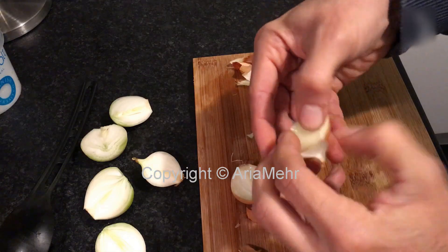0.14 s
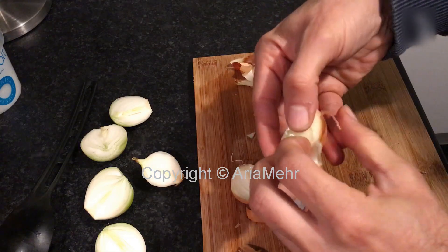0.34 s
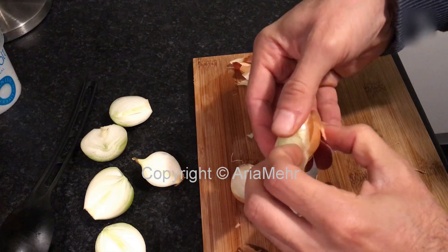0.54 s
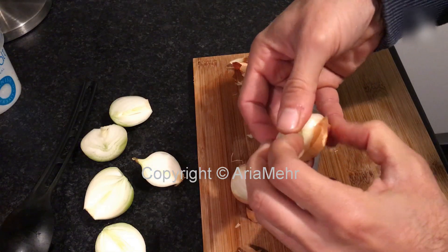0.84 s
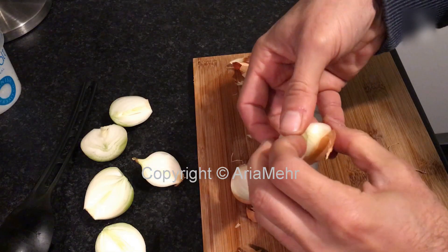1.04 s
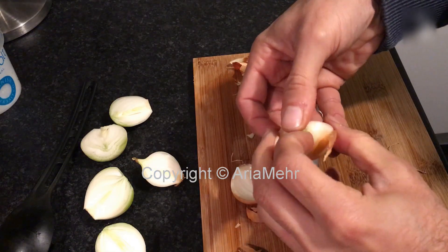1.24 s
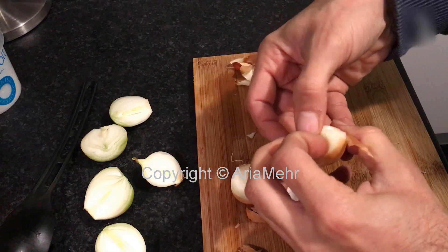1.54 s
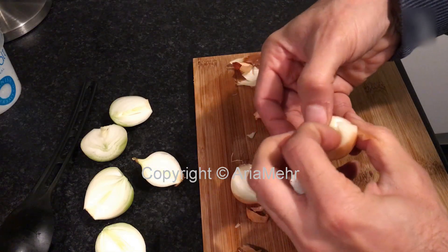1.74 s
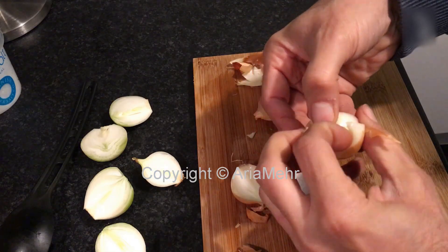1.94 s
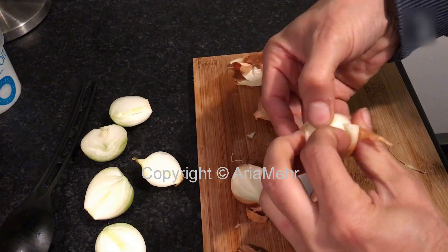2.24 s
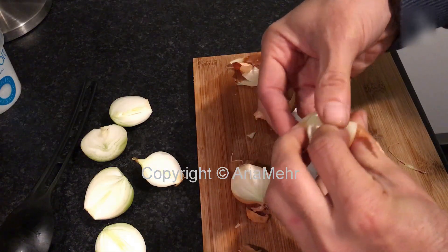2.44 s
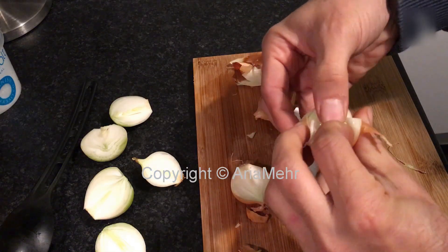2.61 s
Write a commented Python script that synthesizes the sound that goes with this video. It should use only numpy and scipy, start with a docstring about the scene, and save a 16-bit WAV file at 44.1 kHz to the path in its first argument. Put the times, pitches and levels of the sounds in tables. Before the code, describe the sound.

Dry onion skin crackles and snaps as fingers peel it in a quiet kitchen.

```python
"""Peeling a small onion

Fingers peel dry onion skin over a wooden board, close to the microphone in a quiet kitchen.
Each break is a tiny burst of fractures that rings the loose flake; fine crackle and rubbing fill
the gaps, and the hands regrip once with a soft thump. An appliance hums behind, the room answers
briefly, and a limiter ducks after the loudest snaps."""
import sys
import numpy as np
from scipy import signal
from scipy.fft import rfft, irfft, next_fast_len
from scipy.io import wavfile
from scipy.ndimage import uniform_filter1d, minimum_filter1d

SR = 44100
rng = np.random.default_rng(int(sys.argv[2]) if len(sys.argv) > 2 else 0)


def generate_wav(sig):
    """Save sig (samples, or channels by samples) to the path in sys.argv[1] as 16-bit PCM at SR."""
    pcm = np.round(np.clip(np.atleast_2d(sig).T, -1, 1) * 32767).astype(np.int16)
    wavfile.write(sys.argv[1], SR, pcm)


N = 122157

# skin breaks, levels before trim: t/s, burst decay/s, ring f/Hz, ring/dB, crack/dB, knock/dB
SKIN_BREAKS = [(.0144,0.00059,5330,-30,-29,-45), (.0272,0.00064,5700,-9,-5,-22),
               (.0341,0.00055,5650,-19,-14,-40), (.0781,0.00037,5600,-15.5,-18,-39),
               (.0885,0.00068,4940,-13.5,-22,-29), (.0962,0.00065,5600,-12.5,-17.5,-33),
               (.1084,.0018,4810,-21,-29,-34), (.1155,0.00069,5330,-24,-27,-37),
               (.1236,.0009,4600,-28,-30,-39), (.1484,.0006,4600,-20,-24,-43),
               (.1823,0.00024,5130,-15,-13.5,-28), (.1851,0.00044,5200,-3.5,-6,-41),
               (.2257,0.00062,5340,-32,-28,-33), (.2408,0.00058,5470,-11.5,-6.5,-41),
               (.2533,0.00076,5800,-18,-11.5,-22), (.3169,0.0021,5160,-8,-8.5,-24),
               (.3186,0.0016,4970,-23,-14,-40), (.3203,.0012,4890,-3,-2,-52),
               (.3514,0.00089,5600,-18.5,-16.5,-52), (.399,.0012,5010,-19.5,-17.5,-29),
               (.4392,.0003,5860,-31.5,-22.5,-52), (.4434,0.00045,5840,-27.5,-20,-38),
               (.4841,.0007,5790,-36,-35,-53), (.5673,0.00053,6350,-36,-25,-32),
               (.5712,.0014,4740,-29,-34,-51), (.5759,0.00021,4870,-27,-30,-41),
               (.6056,0.0015,4400,-18.5,-23,-23.5), (.7835,0.0012,3830,-40,-40,-47),
               (.8707,.0009,5100,-34,-34.5,-41), (1.2384,.0005,7200,-40,-34,-55),
               (1.2855,0.0058,6000,-22.5,-23,-33), (1.3149,0.0029,6200,-29.5,-32,-47),
               (1.3984,.001,6800,-54,-36,-50), (1.4807,.0018,4800,-31.5,-30,-49),
               (1.543,.0003,4380,-27,-30,-48), (1.5473,0.00093,5100,-27,-31,-48),
               (1.5556,.0018,5100,-13,-22.5,-26.5), (1.5594,.0022,5230,-20,-20,-28),
               (1.5678,0.00025,4900,-2,-7,-21), (1.5782,0.00019,5030,-4.5,-17,-33),
               (1.5874,0.00047,4800,-17,-22,-35), (1.602,0.00055,4760,-22,-30,-32),
               (1.607,0.00055,5040,-12,-26,-24), (1.6113,0.00086,4200,-0.5,-6.5,-9),
               (1.6343,.0006,4400,-17.5,-23,-48), (1.6566,0.0007,3700,-3.5,-14,-13),
               (1.7036,.001,4900,-33,-24.5,-41), (1.787,0.00052,5200,-20.5,-22.5,-48),
               (1.802,0.00026,6200,-24,-28.5,-38), (1.823,0.00035,4740,-24.5,-30,-45),
               (1.837,0.00079,3580,-7.5,-14,-17.5), (1.8933,.0008,5870,-28,-27,-56),
               (1.9114,0.00035,4640,-18.5,-22,-27), (1.9206,0.00044,4190,-27,-25.5,-37),
               (1.939,0.00041,3650,-21.5,-26,-33), (1.972,0.00087,4080,-21.5,-25,-32),
               (2.0246,.0005,3250,-2,-11.5,-20), (2.047,.0011,6500,-19,-28,-33),
               (2.055,0.00036,6360,-24,-37,-48), (2.0646,.0006,3580,-2.5,-8,-9),
               (2.1638,.0004,3650,-36,-29,-40), (2.1781,0.00045,4300,-16,-17,-28.5),
               (2.3183,.0004,6300,-26.5,-37,-44), (2.3357,0.00016,5100,-19,-19,-31),
               (2.3495,.0003,6760,-35,-28,-50), (2.4009,0.00064,5300,-24.5,-25,-29.5),
               (2.41,0.0015,2600,-35.5,-35,-27), (2.4373,0.00098,5400,-30.5,-27,-37),
               (2.4555,0.0024,2630,-30.5,-31,-38), (2.5196,0.00072,2970,-27,-34,-26.5),
               (2.5637,0.00032,3250,-16,-24,-20), (2.585,0.00089,3370,-18.5,-13,-20),
               (2.6411,0.00028,3170,-4.5,-12.5,-17), (2.692,0.00043,5300,-18.5,-21,-28),
               (2.7084,0.00066,2640,-15.5,-11,-26), (2.7454,0.00045,3480,-18.5,-19.5,-34),
               (2.7528,0.00034,4630,-21,-26,-26)]
# crackle as the skin is bent and pulled: t/s, level/dB
CRACKLE_ENVELOPE = [(0, -30.5), (.12, -29.5), (.29, -54), (.42, -55), (.52, -42), (.8, -44.5), (.92, -61),
                    (1.2, -47.5), (1.27, -39.5), (1.42, -55), (1.48, -35.5), (1.58, -30.5), (1.75, -39),
                    (1.95, -35), (2.27, -38.5), (2.45, -36.5), (2.67, -43), (2.75, -26)]
# flake resonances: f/Hz, relative level/dB
FLAKE_MODES = [(1700, -8), (3200, -11.5), (4800, 4.5), (6800, -8), (9000, 0.5), (12000, 12), (14500, -9)]
# fingertips sliding on the skin: t/s, level/dB
RUB_ENVELOPE = [(0, -45), (.13, -40.5), (.29, -33.5), (.37, -35.5), (.5, -43.5), (.83, -42.5), (.86, -57),
                (1.21, -54), (1.245, -53), (1.32, -39), (1.35, -69), (1.44, -62), (1.48, -43),
                (1.75, -39.5), (2.14, -47), (2.27, -43.5), (2.45, -38.5), (2.69, -45), (2.73, -26.5)]
# rubbing spectrum: f/Hz, relative density/dB
RUB_SPECTRUM = [(200, -38), (900, -1.5), (2000, 11.5), (4000, 11.5), (7000, 1.5), (10500, -0.5),
                (12500, 10), (16000, -10)]
# grip shift: t/s, 1/e half-width/s, level/dB
GRIP_THUMPS = [(1.918, .035, -25)]
# thump spectrum: f/Hz, relative density/dB
THUMP_SPECTRUM = [(20, -19.5), (42, -6), (70, 3), (130, -4), (200, -21), (500, -48), (2000, -80)]
# appliance tones: f/Hz, level/dB
HUM_TONES = [(100, -39), (171.5, -44.5), (199.6, -34), (300.5, -51), (399.5, -53)]
# steady room noise: f/Hz, relative density/dB
RUSH_SPECTRUM = [(20, -34), (35, -18.5), (52, 1.5), (78, -17.5), (105, 2.5), (135, -2), (190, -7),
                 (250, -12), (450, -19), (700, -19), (1000, -18.5), (1600, -31), (2500, -39), (5000, -36.5),
                 (9000, -48.5), (16000, -42)]
# colour of the reflections: f/Hz, relative density/dB
ECHO_SPECTRUM = [(300, 0.5), (1500, 4.5), (3400, 2), (6000, 3), (10000, 0.5), (16000, -3.5)]
# microphone response: f/Hz, gain/dB
MIC_RESPONSE = [(600, 0), (800, -5), (1300, -4), (1650, -0.5), (1900, 1), (3200, -1.5), (3900, -6),
                (4700, -4.5), (6800, 0.5), (7700, 0), (8900, 1), (10400, -6), (11800, -3.5), (14000, -6),
                (16000, 2)]

RING_TRIM_DB, CRACK_TRIM_DB, KNOCK_TRIM_DB = 3, 5.5, 2
CRACK_HZ, KNOCK_HZ = 10940, 1534
EARLY_GAP_S, EARLY_T60_S, EARLY_DB = 0.0013, 0.041, -9.5  # reflections off hands and board


def snaps():
    """Each break, a dying burst of fractures scattered by the hands, drives a ring, crack and knock."""
    lead_s, level_window_s = 0.001, 0.0035
    out = np.zeros(N + SR)
    t = np.arange(SR // 25) / SR - lead_s
    scatter = decay(t, EARLY_GAP_S, EARLY_T60_S)
    for start_s, decay_s, ring_hz, ring_db, crack_db, knock_db in SKIN_BREAKS:
        fracture = np.exp(-t / decay_s) * (t >= 0)
        envelope = np.hypot(unit(fracture), undb(EARLY_DB) * unit(scatter))
        burst = whiten(rng.standard_normal(len(t)) * envelope)
        i = max(int((start_s - lead_s) * SR), 0)
        for hz, q1, q2, db in ((ring_hz, 1.31, 0.88, ring_db + RING_TRIM_DB),  # flake ring
                               (CRACK_HZ, 1, 0.28, crack_db + CRACK_TRIM_DB),  # treble crack
                               (KNOCK_HZ, 1, 0.6, knock_db + KNOCK_TRIM_DB)):  # hollow knock
            band = resonate(resonate(burst, hz, q1), hz, q2)
            out[i:i + len(t)] += band * undb(db) * np.sqrt(level_window_s * SR / np.sum(band ** 2))
    return out[:N]


def crackle(rate_per_s=800, spread_db=4.2):
    """Small fractures, most faint and a few strong, each shared unevenly among the flakes."""
    size = np.minimum(rng.exponential(size=N), 4)
    fractures = (rng.random(N) < rate_per_s / SR) * undb(spread_db * size)
    flakes = sum(undb(db) * unit(resonate(fractures * rng.standard_normal(N), hz, q=0.53))
                 for hz, db in FLAKE_MODES)
    return unit(flakes) * curve(CRACKLE_ENVELOPE)


def rubbing(rough_db=3.5, rough_per_s=220):
    """Papery hiss of fingertips that catch and slip."""
    hiss = noise(RUB_SPECTRUM) * undb(rough_db * drift(rough_per_s))
    return unit(hiss) * curve(RUB_ENVELOPE)


def grip_thump():
    """Dull swell as the hands regrip."""
    t = np.arange(N) / SR
    swell = sum(undb(db) * np.exp(-((t - at_s) / width_s) ** 2) for at_s, width_s, db in GRIP_THUMPS)
    return noise(THUMP_SPECTRUM) * swell


def appliance(waver_db=0.5, waver_rad=0.24, rush_db=-31.5):
    """Slightly wavering hum over a low steady rush."""
    t = np.arange(N) / SR
    hum = np.zeros(N)
    for hz, db in HUM_TONES:
        amplitude = np.sqrt(2) * undb(db + waver_db * drift(5.1))
        phase_rad = 2 * np.pi * (hz * t + rng.random()) + waver_rad * drift(3.8)
        hum += amplitude * np.sin(phase_rad)
    return hum + undb(rush_db) * noise(RUSH_SPECTRUM)


def echo(x, gap_s, t60_s, level_db):
    """Dense reflections that start after a gap and die away."""
    tail = noise(ECHO_SPECTRUM) * decay(np.arange(N) / SR, gap_s, t60_s)
    return undb(level_db) * signal.fftconvolve(x, tail / np.sqrt(np.sum(tail ** 2)))[:N]


def microphone(x):
    """Microphone colour as a minimum-phase filter."""
    cepstrum = irfft(np.log(bin_gains(MIC_RESPONSE, 1024)))
    half = len(cepstrum) // 2
    causal = np.r_[cepstrum[0], 2 * cepstrum[1:half], np.zeros(half)]
    impulse_response = irfft(np.exp(rfft(causal)))
    return signal.fftconvolve(x, impulse_response)[:N]


def limiter(x, release_s=0.029):
    """Gain ducks at peaks over full scale, then recovers; any excess clips."""
    fade = np.arange(N) / SR / release_s
    overshoot = np.maximum(np.abs(x) - 1, 1e-9)
    held = np.exp(np.maximum.accumulate(np.log(overshoot) + fade) - fade)
    gain = uniform_filter1d(minimum_filter1d(1 / (1 + held), size=45), size=45)  # 1 ms smoothing
    return np.clip(x * gain, -1, 1)


def undb(db):
    """Decibels to gain."""
    return 10 ** (np.asarray(db) / 20)


def unit(x):
    """Scale to rms 1."""
    return x / np.sqrt(np.mean(x ** 2))


def curve(points):
    """Gain over time from (t/s, level/dB) points."""
    return undb(np.interp(np.arange(N) / SR, *np.array(points).T))


def decay(t, gap_s, t60_s):
    """Exponential fall, muted until the gap ends."""
    return np.exp(-np.log(1000) * t / t60_s) * (t > gap_s)


def bin_gains(points, n):
    """Gains for an n-point FFT from (f/Hz, level/dB) points."""
    hz, db = np.array(points).T
    bin_hz = np.maximum(np.fft.rfftfreq(n, 1 / SR), 1)
    return undb(np.interp(np.log(bin_hz), np.log(hz), db))


def noise(points):
    """Noise of rms 1 shaped by (f/Hz, density/dB) points."""
    n = next_fast_len(N, True)
    spectrum = rfft(rng.standard_normal(n)) * bin_gains(points, n)
    return unit(irfft(spectrum, n)[:N])


def drift(rate_per_s):
    """Smooth random drift of rms 1."""
    hold = int(SR / rate_per_s)
    steps = np.repeat(rng.standard_normal(N // hold + 1), hold)
    return unit(uniform_filter1d(steps, hold)[:N])


def resonate(x, hz, q):
    """One damped resonance."""
    w = 2 * np.pi * hz / SR
    a = np.sin(w) / (2 * q)
    return signal.lfilter([a, 0, -a], [1 + a, -2 * np.cos(w), 1 - a], x)


def whiten(x):
    """Flatten a burst's broad tilt, keep its fine grain."""
    spectrum = rfft(x)
    smooth_power = uniform_filter1d(np.abs(spectrum) ** 2, size=90)
    return irfft(spectrum / np.sqrt(smooth_power + 1e-12), len(x))


def scene():
    """Skin, near and far reflections, hands and appliance; mono."""
    fine = crackle()
    skin = snaps() + fine + echo(fine, EARLY_GAP_S, EARLY_T60_S, EARLY_DB) + rubbing()
    kitchen = echo(skin, gap_s=0.006, t60_s=0.41, level_db=-17)
    return (skin + kitchen + grip_thump() + appliance())[None]


def record(dry):
    """Microphone, limiter, steep low-pass."""
    cutoff_hz = 15800
    lowpass = signal.ellip(10, 0.2, 70, cutoff_hz, fs=SR, output="sos")
    return signal.sosfilt(lowpass, limiter(microphone(dry[0])))[None]


dry = scene()
out = record(dry)
generate_wav(out)
```